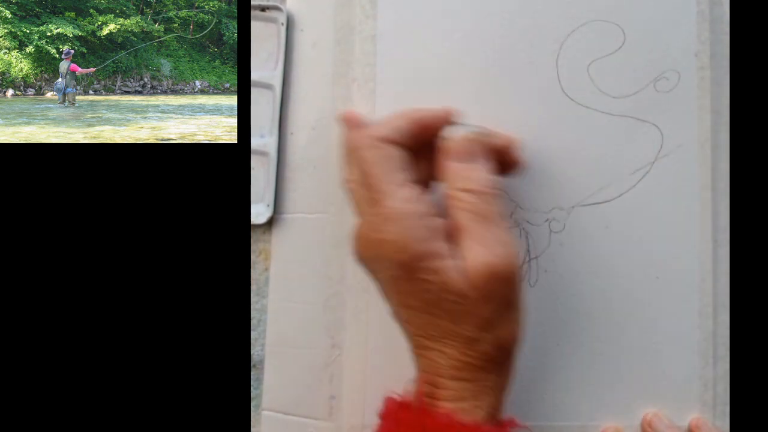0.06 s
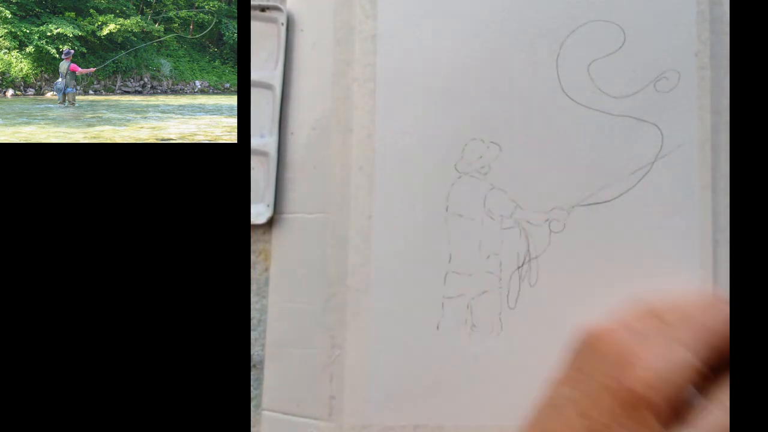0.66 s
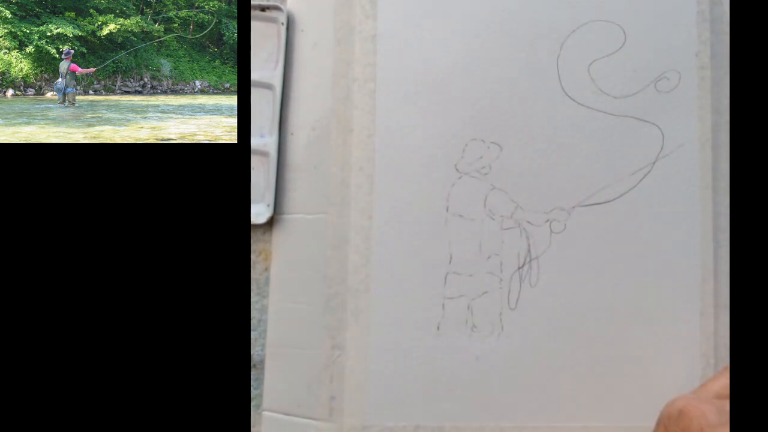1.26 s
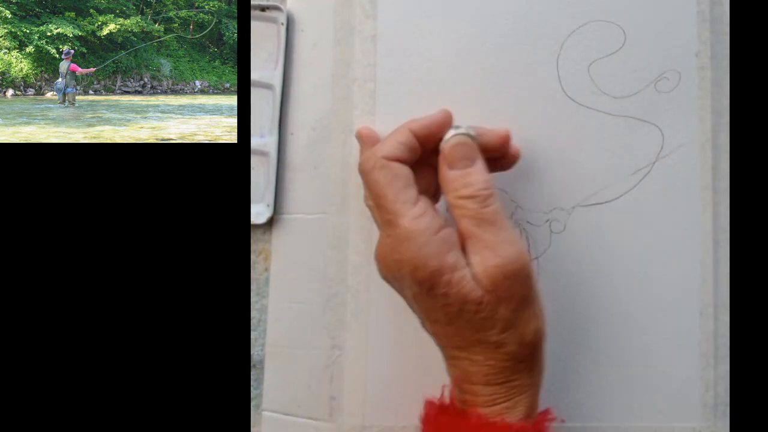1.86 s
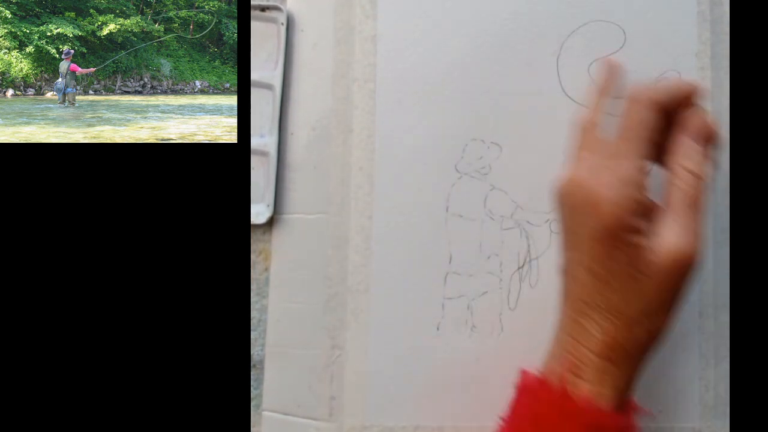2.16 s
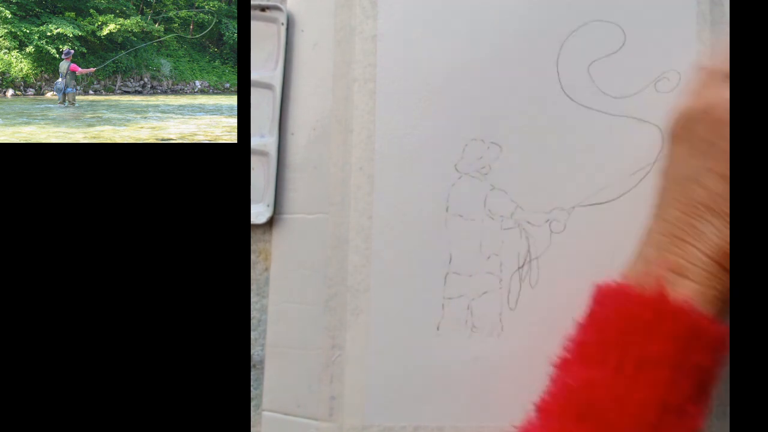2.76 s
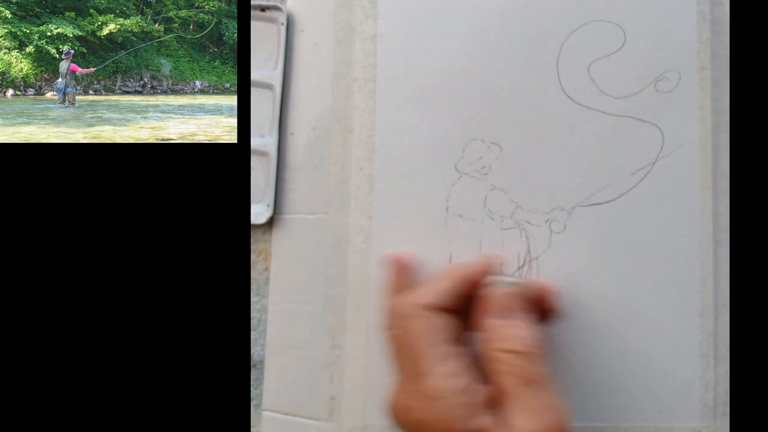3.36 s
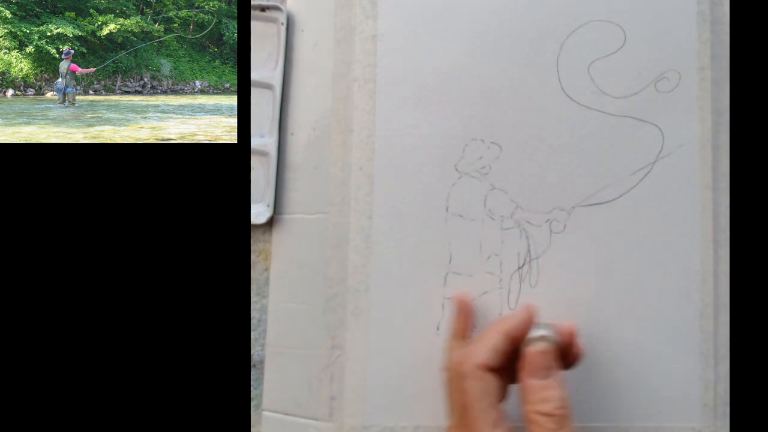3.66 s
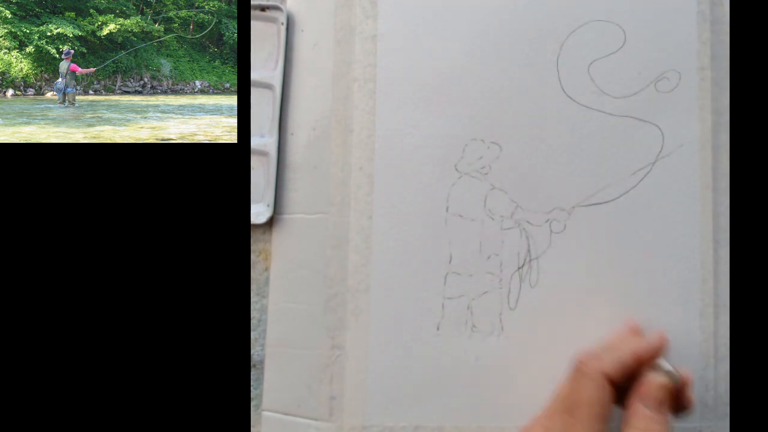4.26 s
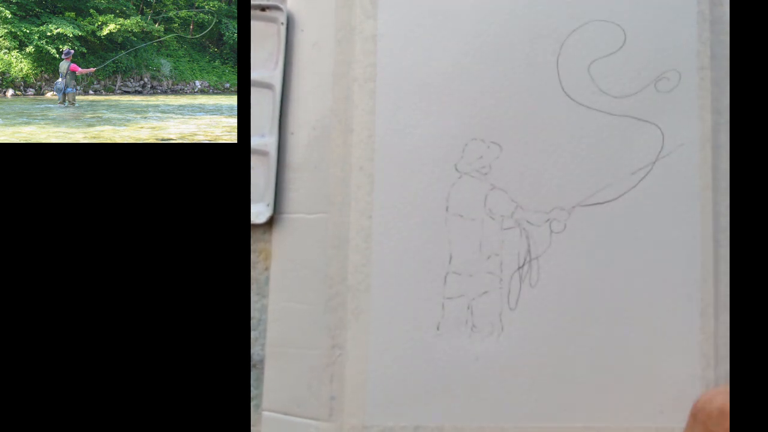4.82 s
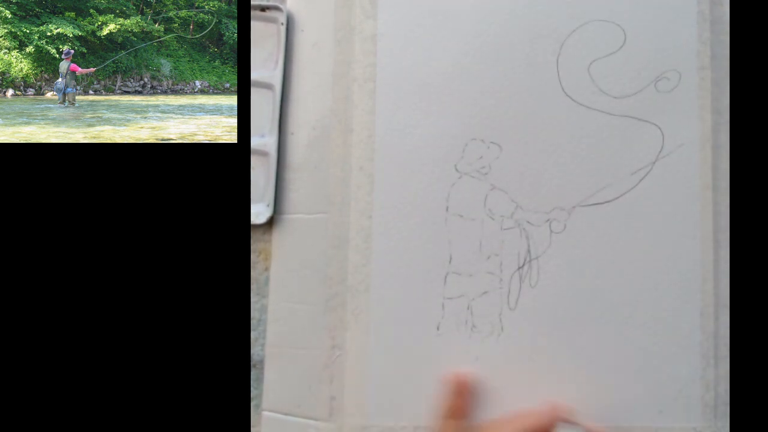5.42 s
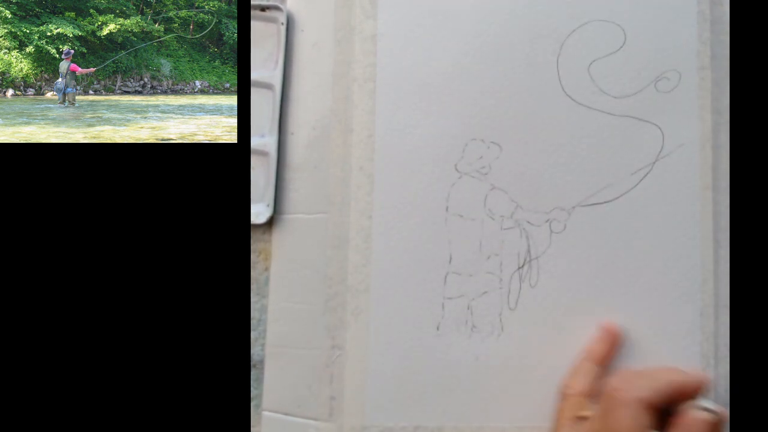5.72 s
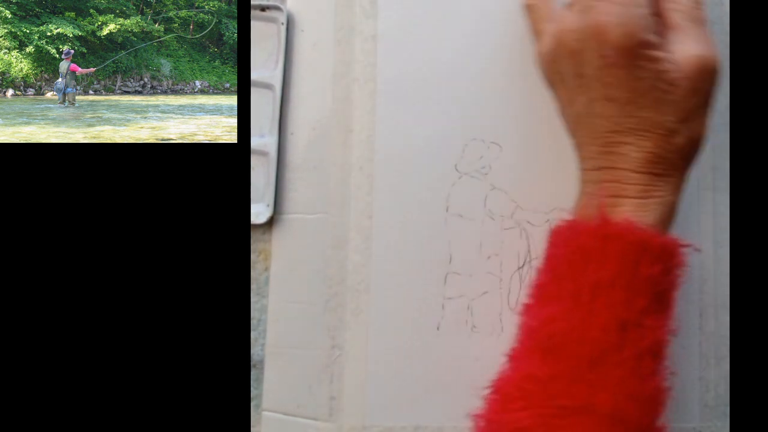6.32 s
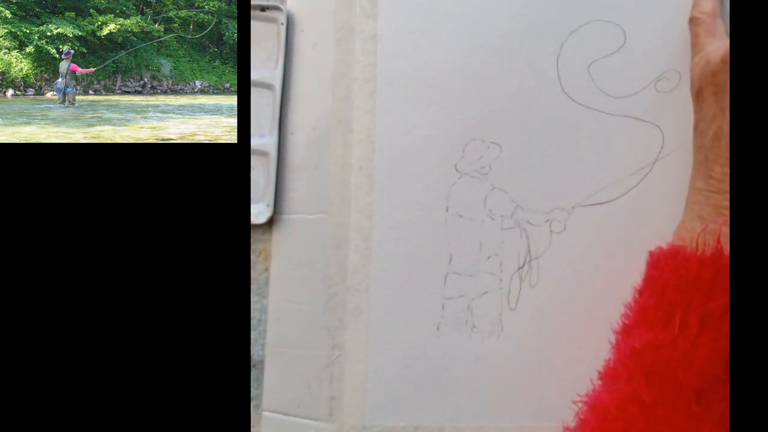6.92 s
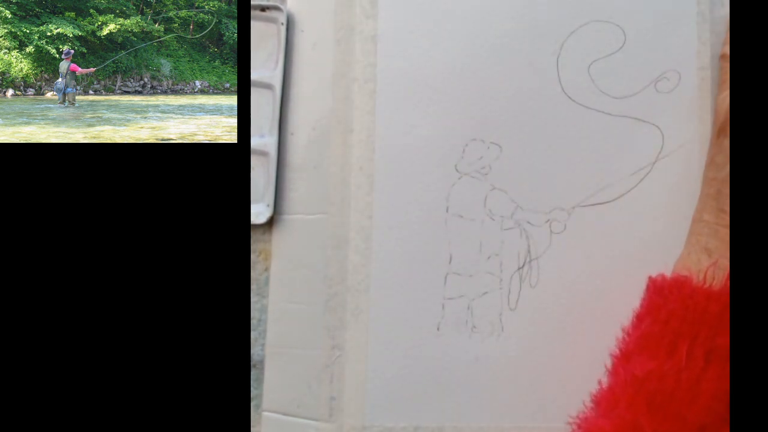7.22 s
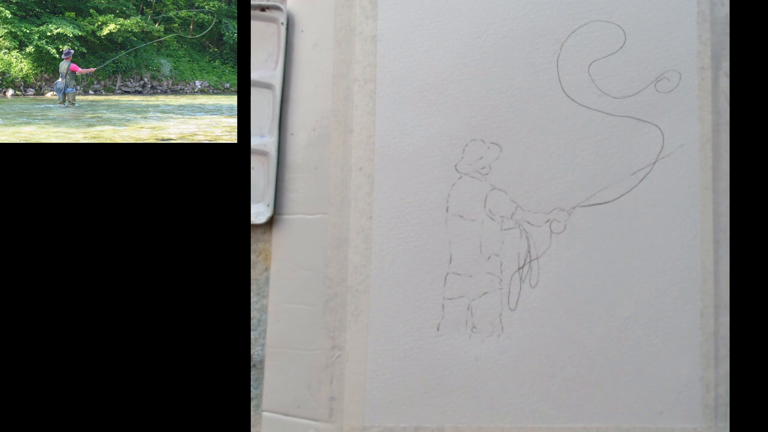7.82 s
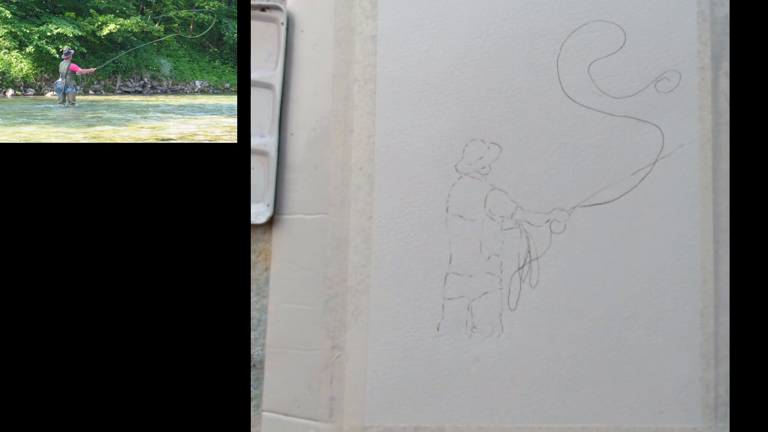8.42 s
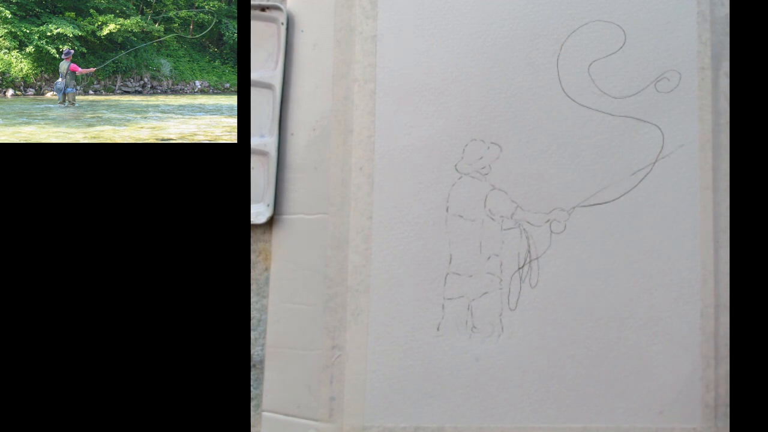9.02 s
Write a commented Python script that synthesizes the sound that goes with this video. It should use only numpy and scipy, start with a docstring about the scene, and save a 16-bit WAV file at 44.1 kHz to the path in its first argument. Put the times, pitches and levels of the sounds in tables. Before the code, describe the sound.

Quick, raspy swishes of skin across paper, with light taps, tiny ticks and a sliding sleeve, above a steady electrical hum.

```python
"""Short, hissing strokes of a hand brushing eraser crumbs off drawing paper taped to a board, close to
a stereo pair of microphones in a small room. Each stroke lands softly, shakes the board, rasps over
the paper's tooth and leaves with a bright hiss, all from tiny slips of skin on the fibres.
Fingers knock, crumbs tick, and at the end hand and sleeve slide slowly back.
Mains hum and a little air lie underneath."""
import sys
import numpy as np
from scipy import signal
from scipy.fft import rfft, irfft, next_fast_len
from scipy.io import wavfile
from scipy.ndimage import uniform_filter1d

SR = 44100
rng = np.random.default_rng(int(sys.argv[2]) if len(sys.argv) > 2 else 0)


def pcm_store(signal):
    """Save signal as 16-bit PCM."""
    levels = np.round(np.clip(np.atleast_2d(signal), -1, 1) * 32767)
    wavfile.write(sys.argv[1], SR, levels.astype(np.int16).T)


N = 404831
TIME = np.arange(N) / SR
FFT_SIZE = next_fast_len(N, True)
FREQS = np.maximum(np.fft.rfftfreq(FFT_SIZE, 1 / SR), 1)

# Hiss of skin or wool on paper. Each row: frequency in Hz, relative density in dB.
HISS_SPECTRUM = [(3000, -43.5), (4500, -9), (5300, -3), (5800, -0.5), (6350, -0.5), (6900, -0.5),
                 (7400, -6), (8000, -16), (8700, -22.5)]
# How alike the rubbing is at the two microphones. Each row: frequency in Hz, likeness from 0 to 1.
RUB_LIKENESS = [(1100, 1), (1450, 0.65), (2100, 0.1), (2800, 0.25), (5000, 0.5), (6600, 1), (8000, 0.1)]


def from_db(db):
    """Decibels to gain."""
    return 10 ** (np.asarray(db) / 20)


def rms_one(x):
    """Scale to rms 1."""
    return x / np.sqrt(np.mean(x ** 2) + 1e-20)


def in_time(rows, outside=None):
    """The columns of a table that starts with seconds, at every sample."""
    times, *columns = np.transpose(rows)
    return [np.interp(TIME, times, column, outside, outside) for column in columns]


def over_hz(points):
    """A table of (Hz, value) at every frequency."""
    hz, value = np.transpose(points)
    return np.interp(np.log(FREQS), np.log(hz), value)


def drift(rate):
    """A smooth random curve of rms 1 that changes about rate times a second."""
    spectrum = rfft(rng.standard_normal(FFT_SIZE)) / (1 + (FREQS / rate) ** 2)
    return rms_one(irfft(spectrum, FFT_SIZE)[:N])


def swell(middle, length, level_db):
    """A bell-shaped gain that stays above half its height for length seconds."""
    return from_db(level_db) * .5 ** np.minimum((2 * (TIME - middle) / length) ** 2, 40)


def band(x, low_hz, high_hz):
    """A gentle band-pass."""
    return signal.sosfilt(signal.butter(2, [low_hz, high_hz], "band", fs=SR, output="sos"), x + 1e-18)


def band_noise(shape, low_hz, high_hz):
    """A band of noise with rms 1."""
    return rms_one(band(rng.standard_normal(shape), low_hz, high_hz))


def cut_above(x, hz):
    """A very steep low-pass."""
    return signal.sosfilt(signal.ellip(10, .1, 70, hz, fs=SR, output="sos"), x)


def clicks_at(times, level_db):
    """One click at each time."""
    out = np.zeros(N)
    out[np.round(times * SR).astype(int)] = from_db(level_db)
    return out


def dying(clicks, t60):
    """Each click becomes a gain that dies away."""
    return signal.lfilter([1], [1, -from_db(-60 / (t60 * SR))], clicks + 1e-18)


def ring(clicks, hz, t60):
    """A unit click sets a sine of height 1 ringing."""
    decay, step = from_db(-60 / (t60 * SR)), 2 * np.pi * hz / SR
    return signal.lfilter([0, np.sin(step)], [1, -2 * decay * np.cos(step), decay ** 2], clicks + 1e-18)


def whistle(hz, width_hz):
    """Narrow noise around a pitch that may move."""
    wander = drift(width_hz) + 1j * drift(width_hz)
    return np.real(wander * np.exp(2j * np.pi * np.cumsum(hz) / SR))


def coloured(drive, colour, likeness):
    """Two unrelated drives become a stereo pair with this spectrum and likeness; the mid has rms 1."""
    alike = np.clip(over_hz(likeness), 0, 1)
    spectra = rfft(drive, FFT_SIZE) * from_db(over_hz(colour)) * np.sqrt([1 + alike, 1 - alike])
    mid, side = irfft(spectra, FFT_SIZE)[:, :N]
    return (mid + side * [[1], [-1]]) / np.std(mid)


def toward(x, lead_ms, pan_db):
    """The nearer microphone hears a sound earlier and louder; positive is left."""
    return np.array([from_db(side * pan_db) * np.interp(TIME + side * lead_ms / 1000, TIME, channel)
                     for side, channel in zip((.5, -.5), x)])


def out_of_step(hiss):
    """The hiss reaches the two microphones out of phase; its mid keeps its level."""
    # Each row: frequency in Hz, lead of the left microphone in radians.
    phase_lead = [(4900, 0.94), (5500, 0.37), (7000, 0.44)]
    turn = 1j * np.tan(np.clip(over_hz(phase_lead), 0, 2) / 2)
    return irfft(rfft(hiss, FFT_SIZE) * np.array([1 + turn, 1 - turn]), FFT_SIZE)[:, :N]


def room_tone():
    """Mains hum swells slightly and wavers over a deep, unsteady drone, soft air and rumble."""
    # Tones of the hum. Each row: frequency in Hz, rms level in dB before swell and panning.
    hum_tones = [(119.8, -44), (237, -72), (504.5, -73.5)]
    # Spectra of the room's air and rumble. Each row: frequency in Hz, relative density in dB.
    air_spectrum = [(120, -12), (240, 0), (370, -6), (560, -2), (800, -8), (1400, -12), (1800, -18),
                    (2250, -15), (3000, -19), (6300, -24), (7500, -30), (8500, -44)]
    rumble_spectrum = [(15, 10.5), (30, 9), (48, 3.5), (65, 12.5), (110, 8), (170, 9.5), (260, -5),
                       (500, -110.5)]
    # How alike both are at the two microphones. Each row: frequency in Hz, likeness from 0 to 1.
    likeness = [(30, 0.12), (600, 0.75), (1100, 0.54), (1700, 0.32), (5500, 0.32), (7200, 0.34)]
    hum = sum(np.sqrt(2) * from_db(db) * np.sin(2 * np.pi * (hz * TIME + rng.random()))
              for hz, db in hum_tones)
    swell_db = np.interp(TIME, [0, 1.0, 3.5], [-2.2, -1.0, 0])
    hum = hum * from_db(swell_db + 0.19 * drift(1.7)) * from_db([[-.65], [.65]])   # a little to the right
    air = coloured(rng.standard_normal((2, N)), air_spectrum, likeness) * from_db(-57 + 1.1 * drift(12))
    rumble = from_db(-57) * coloured(rng.standard_normal((2, N)), rumble_spectrum, likeness)
    drone = from_db(-62) * whistle(hz=np.full(N, 49.5), width_hz=3.7)
    return hum + drone + air + rumble


def whine(hz=8000):
    """A very faint, steady electronic tone."""
    return np.sqrt(2) * from_db(-84) * np.sin(2 * np.pi * hz * TIME)


def reverb(x, wet_db, t60=0.38, first_wall_s=.006):
    """The small room returns a diffuse tail, different at each microphone."""
    t = TIME[:SR]
    tail = band(rng.standard_normal((2, SR)), low_hz=296, high_hz=7040)
    tail *= from_db(-60 * t / t60) * (t > first_wall_s)
    tail /= np.sqrt(np.sum(tail ** 2, axis=1, keepdims=True))
    return from_db(wet_db) * signal.fftconvolve(x, tail, axes=1)[:, :N]


def forearm():
    """A faint low rumble while the arm leans on the board."""
    return swell(middle=5.2, length=0.69, level_db=-58) * band_noise(N, low_hz=177, high_hz=380)


def bright_onsets():
    """Thin, very bright bursts of noise at the start of some strokes."""
    # Each row: start in seconds, level in dB.
    bursts = [(.138, -59), (0.715, -45), (1.62, -62), (3.838, -54), (4.098, -43), (6.366, -55)]
    times, level_db = np.transpose(bursts)
    return dying(clicks_at(times, level_db), t60=0.02) * band_noise((2, N), low_hz=6000, high_hz=8500)


def crumb_ticks(rattle_db=-12, rattle_t60=0.022):
    """A crumb gives way in one sharp crack around its own pitch, and the paper rattles briefly."""
    # Each row: start in seconds, peak of the crack in dB, pitch in Hz.
    ticks = [(2.589, -44, 6200), (2.946, -21, 5000), (4.7762, -26.5, 4260), (6.6873, -21.5, 4300),
             (6.878, -29.5, 4900), (7.069, -31.5, 3270), (7.4904, -31.5, 5740), (7.674, -33, 3440),
             (7.8614, -38, 3400)]
    out, t = np.zeros((2, N)), TIME[:SR // 20]
    for start, peak_db, hz in ticks:
        edges = hz / 2, hz * np.sqrt(2)
        crack = band(1.0 * (t == 0), *edges)
        white = rng.standard_normal(len(t)) + .5 * rng.standard_normal((2, len(t)))
        rattle = from_db(rattle_db - 60 * t / rattle_t60) * rms_one(band(white, *edges))
        at = round(start * SR)
        out[:, at:at + len(t)] += from_db(peak_db) * (crack / np.abs(crack).max() + rattle)
    return out


def fingertip_catch(start_s=4.709, length_s=0.017, pitch_hz=1370):
    """A fingertip sticks and slips in one short, abrupt chirp with a scratchy edge above it."""
    gate = 1.0 * (np.abs(TIME - start_s - length_s / 2) < length_s / 2)
    held = uniform_filter1d(gate, SR // 500)   # 2 ms edges
    chirp = np.sqrt(2) * np.sin(2 * np.pi * np.cumsum(pitch_hz + 200 * drift(200)) / SR)
    scratch = rms_one(cut_above(band_noise(N, low_hz=1000, high_hz=3560), hz=4400))
    return from_db(-40.5) * held * (chirp + from_db(-7) * scratch)


def finger_taps():
    """Each landing slaps the paper and rings the board; weight drives the low modes and cuts the slap."""
    # Each row: start in seconds, relative knock level in dB, weight as extra dB for the low modes.
    landings = [(.154, -45, -2), (0.891, -45.5, -16), (0.898, -40, -20), (1.623, -43.5, -4),
                (1.974, -37.5, -10), (1.98, -31, 6), (2.406, -48.5, 15), (2.807, -48.5, -19),
                (4.098, -41.5, -19), (4.775, -35.5, 4), (5.476, -41, -12), (5.874, -45.5, -26),
                (6.368, -48.5, -29), (6.878, -42, -25), (7.044, -51, -15)]
    # The board's modes. Each row: frequency in Hz, relative level in dB, seconds to fall 60 dB.
    modes = [(30, -19.5, 0.18), (200, -14.5, 0.022), (640, -7.5, 0.0098), (840, 0.5, 0.012),
             (980, -7.5, 0.044), (1110, -7, .035), (1480, -3, 0.0087)]
    times, knock_db, weight_db = np.transpose(landings)
    scatter_db = 2 * rng.standard_normal((len(landings), len(modes)))
    knock = 0
    for k, (hz, mode_db, t60) in enumerate(modes):
        blow_db = knock_db + weight_db if hz < 700 else knock_db
        blows = clicks_at(times, blow_db + mode_db + scatter_db[:, k])
        knock = knock + (-1) ** k * ring(blows, hz, t60)
    pad = signal.windows.hann(SR // 1500)   # a soft fingertip presses for about 0.6 ms
    knock = from_db(12.5) * signal.lfilter(pad / pad.sum(), [1], knock)
    slap = dying(clicks_at(times, knock_db - 10 - 0.45 * weight_db), t60=0.036)
    return knock + slap * band_noise((2, N), low_hz=1400, high_hz=3480)


def slips(per_s, size_db):
    """Skin or wool lets go of paper fibres in tiny random slips of uneven size."""
    sizes = from_db(size_db * np.minimum(rng.exponential(1, (2, N)), 4)) * rng.standard_normal((2, N))
    return sizes * (rng.random((2, N)) < per_s / SR)


def rub(board_gain, rasp_gain, hiss, judder_db, graze=0, dull_hz=3200):
    """Slips shake the board and rasp on the paper, dully in a graze; the grip judders the hiss too."""
    # The hand's place before the microphones. Each row: time in seconds, left lead in ms, pan in dB.
    path = [(.2, 0.074, 0.5), (2.1, 0.054, -0.5), (3.5, 0.092, 0), (5.6, 0.096, 1.3), (6.4, 0.03, -0.5)]
    # Spectra of the rubbed board and the paper's tooth. Each row: frequency in Hz, relative density in dB.
    board_spectrum = [(130, -20), (220, -12.5), (330, -22), (620, -10.5), (740, -8.5), (850, -1.5),
                      (915, -1.5), (980, 3.5), (1230, -3), (1370, 0), (1700, -15), (3500, -53)]
    tooth_spectrum = [(900, -28), (1700, 1.5), (2230, 2), (2450, 2), (2750, 2), (4200, 2), (5200, -0.5),
                      (6000, -6), (8000, -37)]
    lead_ms, pan_db = in_time(path)
    grip = from_db(judder_db * drift(90) + 1.5)
    board_gain = board_gain * from_db(drift(50))
    # the board rings on between slips, which smooths its share of the judder
    board = board_gain * coloured(grip * slips(per_s=3000, size_db=-0.5), board_spectrum, RUB_LIKENESS)
    tooth = coloured(slips(per_s=20000, size_db=1.0), tooth_spectrum, RUB_LIKENESS)
    dull = signal.lfilter(*signal.butter(1, dull_hz, fs=SR), tooth)
    rasp = rasp_gain * grip * (tooth + graze * (dull - tooth))
    return (toward(board, 1.3 * lead_ms, .3 * pan_db)
            + toward(rasp, lead_ms, pan_db + 2.5)
            + toward(hiss * grip, 0, pan_db + 2.0))


def sleeve(typical_board_db=-46.5, typical_rustle_db=-56.5):
    """Wool slides lightly over the edge of the sheet, its fibres crackling finely."""
    # The long slide back. Each row: time in seconds, drive of the board in dB.
    slide = [(7.11, -65), (7.15, -66.5), (7.196, -48.5), (7.256, -49.5), (7.278, -54), (7.55, -41.5),
             (7.605, -52.5), (7.668, -56.5), (7.72, -84)]
    # Soft shifts. Each row: middle and length in seconds, drive of the board and of the rustle in dB.
    shifts = [(5.361, 0.82, -63.5, -66.5), (6.83, 0.21, -61.5, -65.5), (7.083, 0.056, -52.5, -62),
              (8.196, 0.17, -64.5, -71.5), (8.362, 0.05, -58.5, -70), (8.942, 0.028, -53.5, -69.5)]
    slide_db, = in_time(slide, outside=-140)
    board = from_db(slide_db)
    rustle = from_db(typical_rustle_db + 0.88 * (slide_db - typical_board_db))
    for middle, length, board_db, rustle_db in shifts:
        board += swell(middle, length, board_db)
        rustle += swell(middle, length, rustle_db)
    # one hollow note from the board swells as the sleeve bears down
    hollow = board ** 2 * from_db(-7 - typical_board_db) * whistle(hz=np.full(N, 1070), width_hz=150)
    fibres = coloured(slips(per_s=990, size_db=-4.5), HISS_SPECTRUM, RUB_LIKENESS)
    return rub(board * from_db(-0.5), rustle * from_db(3.0), rustle * fibres, judder_db=-1.5) + hollow


def skin_squeaks():
    """Narrow hiss flares where the skin grips, gliding from one pitch to the next."""
    # Each row: middle and length in seconds, relative level in dB, pitch in Hz.
    squeaks = [(.717, 0.0099, -30, 5700), (.77, 0.0085, -29.5, 6300), (.803, 0.012, -32.5, 5650),
               (1.33, 0.042, -36, 5800), (2.563, 0.0083, -31, 6200), (2.838, .03, -36, 5450),
               (3.595, 0.016, -34.5, 5900), (4.205, 0.0088, -33, 6000)]
    middles, _, _, pitches = np.transpose(squeaks)
    gain = sum(swell(middle, length, db) for middle, length, db, _ in squeaks)
    return gain * whistle(np.interp(TIME, middles, pitches), width_hz=340)


def skin_scrape(graze_gain):
    """A stroke's first graze, and now and then a bite of dry skin, scrape lower than the hiss."""
    # Bites into the paper. Each row: middle and length in seconds, level in dB.
    bites = [(3.462, 0.048, -40), (5.126, 0.014, -38.5), (5.947, 0.011, -40), (6.57, 0.041, -46)]
    gain = graze_gain * from_db(-11.5) + sum(swell(*bite) for bite in bites)
    return gain * rms_one(band(slips(per_s=7400, size_db=0.0), low_hz=2310, high_hz=3300))


def stroke_envelopes():
    """Pressure arches through each stroke; follow-through holds the hiss to the lift and ends it crisply."""
    # Each row: touch, full speed and lift in seconds, pressure as drive of the board in dB, drive of
    # the hiss in dB, follow-through from 0 (brakes on the paper) to 1 (leaves at full speed).
    strokes = [(.138, .218, .312, -33.6, -31, .87), (.708, .711, .809, -37, -34, 1),
               (1.148, 1.23, 1.343, -37, -35, .93), (1.617, 1.666, 1.764, -38.8, -33.8, .98),
               (1.997, 2.028, 2.139, -36.6, -31.8, 1), (2.407, 2.436, 2.561, -37, -35.3, .74),
               (2.805, 2.829, 2.955, -39.3, -38, 1), (3.428, 3.47, 3.603, -38.7, -35.3, .91),
               (3.836, 3.862, 3.956, -45.4, -39.6, .97), (4.097, 4.098, 4.11, -43, -41, .6),
               (4.14, 4.18, 4.267, -45, -38.5, .85), (4.484, 4.54, 4.598, -40.4, -35.8, .7),
               (4.798, 4.846, 4.882, -41, -31.4, .2), (5.114, 5.116, 5.146, -43.5, -46, .25),
               (5.488, 5.56, 5.621, -40, -30, .22), (5.869, 5.931, 5.958, -45.3, -33.3, .1),
               (6.365, 6.405, 6.627, -37.8, -39, .68)]
    touch_db, attack_s, settle_s = -47.5, 0.0034, 0.0099   # quicker than settle_s, a stroke lands hard
    ease_db, boom_db = 4, 2   # pressure eases toward the lift; the board booms where it peaks
    skim_db, bulge_db, choke_db = 2, 7, 9.5   # a full sweep rasps less and chokes the hiss's midway bulge
    board, rasp, hiss, pressure, graze = np.zeros((5, N))
    for touch, full, lift, press_db, hiss_db, follow in strokes:
        release_s = np.interp(follow, [0, 1], [0.12, 0.0099])   # time to fall 30 dB
        now = (TIME >= touch) & (TIME < lift + 2 * release_s)
        t, middle = TIME[now], (full + lift) / 2
        lifted_db = -30 * np.maximum(t - lift, 0) / release_s
        contact_db = lifted_db - 9 * np.exp((touch - t) / attack_s)
        landing = np.clip((middle - t) / (middle - touch), 0, 1) ** 2
        leaving = np.clip((t - middle) / (lift - middle), 0, 1) ** 2
        pressure[now] = 1 - landing - leaving
        graze[now] = np.sqrt(landing)

        soft_db = (press_db - touch_db) * (1 - np.exp((touch - full) / settle_s))
        arch_db = contact_db - soft_db * landing - ease_db * leaving
        rasp_db = -46.5 + 0.85 * (press_db - touch_db) - skim_db * follow ** 3
        board[now] += from_db(press_db + arch_db + boom_db * (pressure[now] ** 6 - .5))
        rasp[now] += from_db(rasp_db + arch_db)

        slow_db = rasp_db - soft_db - 5.5   # the hiss before the hand gathers speed
        change_db = np.interp(follow, [0, 1], [-18, 3])   # from full speed to lift
        midway_db = hiss_db + change_db / 2 + bulge_db - choke_db * follow ** 3
        hiss_points_db = [slow_db, hiss_db, midway_db, hiss_db + change_db]
        hiss[now] += from_db(np.interp(t, [touch, full, middle, lift], hiss_points_db) + contact_db)
    return board, rasp, hiss, pressure, graze


def hand():
    """Strokes shake the board and rasp on the paper; the finest slips merge into a bright hiss."""
    board_gain, rasp_gain, hiss_gain, pressure, graze = stroke_envelopes()
    scrape = skin_scrape(rasp_gain * graze)
    # a soft whistle wanders and climbs in mid-stroke
    singing = from_db(-8) * whistle(hz=5950 + 450 * pressure + 380 * drift(20), width_hz=160)
    flutter = from_db(1.2 * drift(35))
    hiss = from_db(-3.0) * coloured(slips(per_s=24000, size_db=2.5), HISS_SPECTRUM, RUB_LIKENESS)
    bright = out_of_step(hiss_gain * flutter * (hiss + singing) + from_db(-2.5) * skin_squeaks())
    heave = board_gain * from_db(-10.5) * band_noise(N, low_hz=2.5, high_hz=46.5)
    return rub(board_gain, rasp_gain, bright, judder_db=0.77, graze=graze) + scrape + heave


def scene():
    """Close work on the paper over the room tone, its top cut steeply, with bright onsets added."""
    paper = hand() + sleeve() + forearm() + finger_taps() + crumb_ticks() + fingertip_catch()
    at_microphones = paper + reverb(paper, wet_db=-13.5) + room_tone() + whine()
    return cut_above(at_microphones, hz=8550) + bright_onsets()


def record(dry):
    """The recorder cuts the top steeply."""
    return cut_above(dry, hz=14000)


dry = scene()
out = record(dry)
pcm_store(out)
```